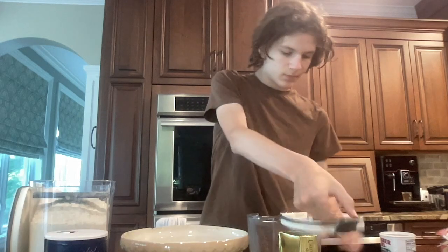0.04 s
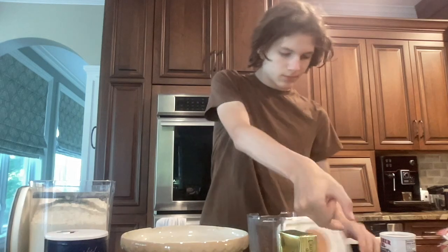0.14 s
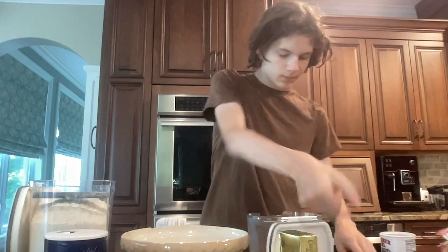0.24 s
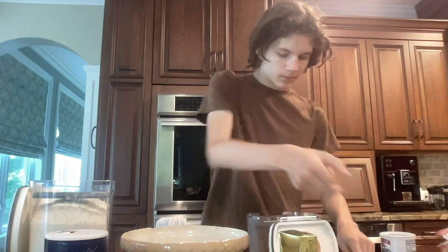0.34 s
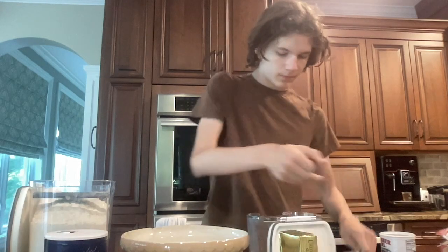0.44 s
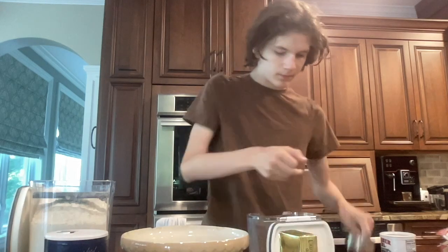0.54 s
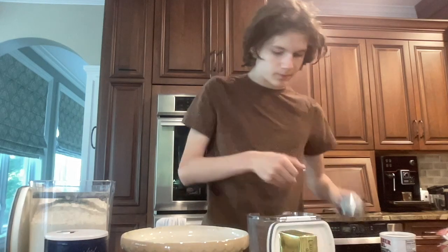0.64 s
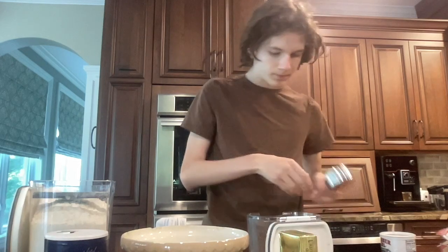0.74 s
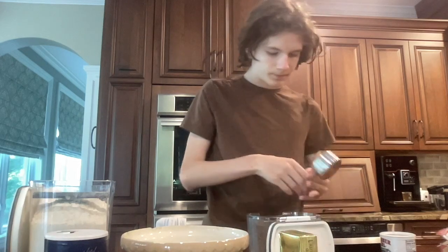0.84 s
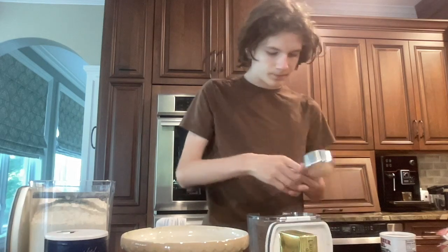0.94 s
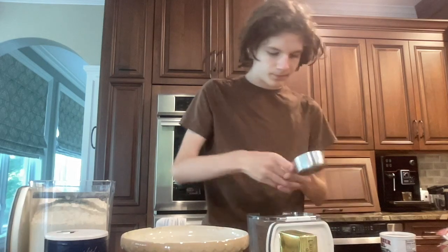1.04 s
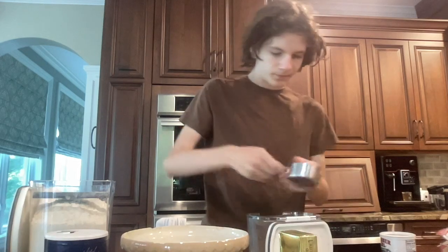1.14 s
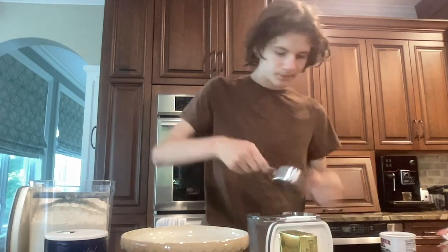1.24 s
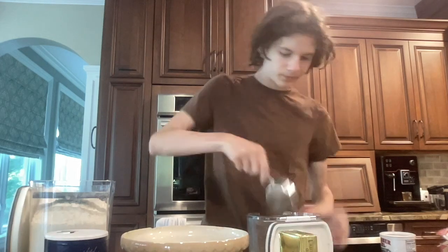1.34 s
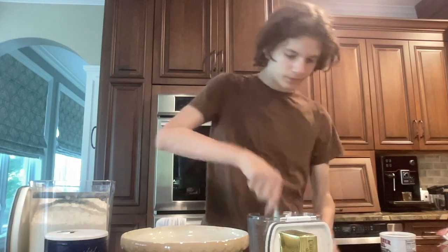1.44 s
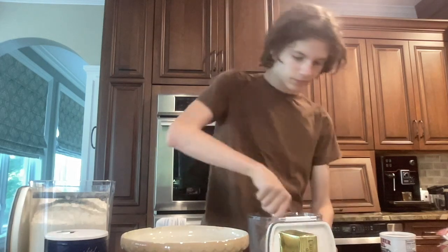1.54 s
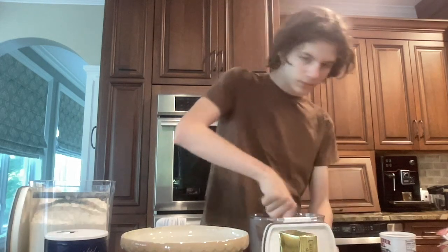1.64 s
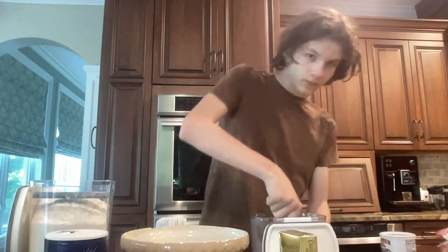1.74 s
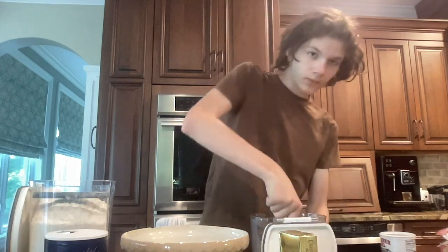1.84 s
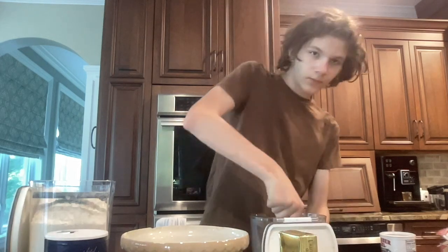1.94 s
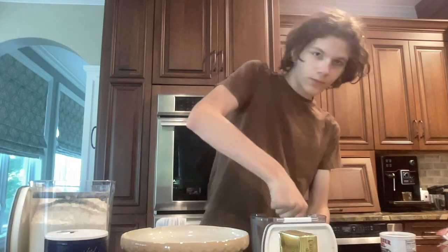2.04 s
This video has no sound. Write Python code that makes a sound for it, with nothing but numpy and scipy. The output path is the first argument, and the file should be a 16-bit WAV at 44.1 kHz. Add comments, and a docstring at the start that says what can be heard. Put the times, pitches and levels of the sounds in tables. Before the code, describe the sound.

A container lands on a kitchen counter with loud, hollow, clattering knocks and a low cabinet boom, then a loose object ticks quietly until a metal cup hits the rim and scrapes into sugar; close microphone, hard room.

```python
"""A sugar container is set down on a kitchen counter, close to the microphone: faint touches, then heavy knocks and
bounces, made of damped modes and short noise bursts, with a boom from the cabinet below.
Something loose on the counter rocks on with ever quicker double ticks, until a second knock, when a steel measuring
cup strikes the rim; the loose object still ticks while the cup, ringing under friction, is pushed into the sugar.
The hard kitchen answers every blow with reflections and a tail of noise, over quiet room air."""
import sys
import numpy as np
from scipy import signal
from scipy.fft import rfft, irfft, next_fast_len
from scipy.io import wavfile

SR = 44100
rng = np.random.default_rng(int(sys.argv[2]) if len(sys.argv) > 2 else 0)


def wav_out(sig):
    """Save sig, one row per channel (or a flat mono array), as 16-bit PCM at SR to the path in sys.argv[1]."""
    wavfile.write(sys.argv[1], SR, np.round(np.clip(np.atleast_2d(sig).T, -1, 1) * 32767).astype(np.int16))


N = 92610  # 2.1 s
T = np.arange(SR) / SR  # one second, the length of every single sound

# Colour of the hard contact noise, columns: freq_hz [Hz], level_db [dB]
CLACK_COLOUR = [(100, -24), (400, -3.5), (800, -1.5), (1350, 1), (2200, -2.5), (3000, -9.5), (4500, -30.5),
                (16000, -49)]
# Colour of the loose object's click, columns: freq_hz [Hz], level_db [dB]
CLICK_COLOUR = [(150, -7), (600, 13.5), (850, -11.5), (1300, 0), (1950, 2.5), (2800, -11.5), (6200, -16),
                (8200, -18), (10000, -33)]
# The counter's give under a weight, columns: freq_hz [Hz], level_db [dB], t60_s [s]
WOOD_MODES = [(140.34, -10.5, 0.18), (203.1, -3, 0.0547)]
# Decay of the noise that starts each burst, before burst() reshapes it
CLACK_T60_S, CLICK_T60_S = 0.0174, 0.0533
CONTACT_RISE_S, BOOM_RISE_S = 0.00054, 0.013
# How strongly each sound feeds the diffuse tail of the room
THUNK_WET_DB, CLACK_WET_DB = -1.5, -4.5


def amp(db):
    """Decibels to gain."""
    return 10 ** (np.asarray(db) / 20)


def unit(x):
    """Scale to rms 1."""
    return x / np.sqrt(np.mean(x ** 2) + 1e-20)


def along(points, hz):
    """Read (Hz, value) points at any frequency, on a log axis."""
    f, v = np.transpose(points)
    return np.interp(np.log(hz + 1), np.log(f + 1), v)


def filtered(x, gain):
    """x times a gain that depends on frequency."""
    m = next_fast_len(len(x) + SR // 2)
    hz = np.fft.rfftfreq(m, 1 / SR)
    return irfft(rfft(x, m) * gain(hz), m)[:len(x)]


def noise(colour):
    """Steady coloured noise of rms 1."""
    white = rng.standard_normal(N)
    return unit(filtered(white, lambda hz: amp(along(colour, hz))))


def add(track, s, sound):
    """Mix a sound in at time s."""
    part = track[max(0, round(s * SR)):][:len(sound)]
    part += sound[:len(part)]


def causal(colour):
    """The minimum-phase response that has this colour."""
    gain = amp(along(colour, np.fft.rfftfreq(SR, 1 / SR)))
    cepstrum = irfft(np.log(gain), SR)
    cepstrum[1:SR // 2] *= 2
    cepstrum[SR // 2 + 1:] = 0
    return np.exp(rfft(cepstrum))


def burst(colour, t60):
    """Many dense, quickly damped modes of uneven strength, then coloured; the energy depends only on t60."""
    fade = amp(-60 * T / t60)
    spectrum = rfft(rng.standard_normal(SR) * fade)
    evened = spectrum / np.abs(spectrum) ** .4  # strong and weak modes drawn closer
    x = irfft(evened, SR) * np.sqrt(np.sqrt(fade))
    coloured = irfft(rfft(x) * causal(colour), SR)
    return unit(coloured) * np.sqrt(np.mean(fade ** 2))


def ring(modes, rise_s, scatter=0, pitch=1):
    """Damped modes, in step or with scattered phases (scatter in turns)."""
    turns = scatter * rng.random(len(modes))
    tones = np.zeros(SR)
    for (hz, db, t60), turn in zip(modes, turns):
        tones += amp(db - 60 * T / t60) * np.sin(2 * np.pi * (pitch * hz * T + turn))
    return tones * (1 - np.exp(-T / rise_s))


def kitchen(sound, wet_db=0):
    """A sound with its near reflection, clumpy scatter from the cupboards and a diffuse tail."""
    # Decay of the tail, columns: freq_hz [Hz], t60_s [s]
    tail_t60 = [(100, 1.33), (500, 0.5236), (2000, 0.6884), (5000, 0.673), (9000, 0.38), (15000, 0.16)]
    # Level of the tail, columns: freq_hz [Hz], level_db [dB]
    tail_level = [(60, -3), (250, -1), (520, -13), (800, -7.5), (3000, -12), (8000, -4.5), (15000, -5.5)]
    early_db, early_t60_s, rise_s = -9, 0.24, 0.0033
    clump_db, clumps_per_s = 3, 240  # spread and rate of the uneven clumps
    wall_s, wall_db = 0.0093, -17  # the nearest reflection

    # Noise that dies away at its own rate in each band
    hz, t, z = signal.stft(rng.standard_normal(SR), SR, nperseg=256)
    t60 = along(tail_t60, hz)[:, None]
    decay = amp(along(tail_level, hz)[:, None] - 60 * t / t60)
    even_energy = np.sqrt(2 * np.log(1000) / (t60 * SR))
    tail = signal.istft(z * decay * even_energy, SR, nperseg=256)[1][:SR]

    rise = 1 - np.exp(-(T / rise_s) ** 2)
    wander = np.interp(T * clumps_per_s, np.arange(SR), rng.standard_normal(SR))
    clumps = unit(amp(clump_db * wander))
    scatter = rng.standard_normal(SR) * clumps * rise * amp(-60 * T / early_t60_s)
    early = unit(scatter) / np.sqrt(SR)  # total energy 1

    answer = amp(wet_db) * tail * rise + amp(early_db) * early
    answer[0] = 1  # the direct sound
    answer[round(wall_s * SR)] += amp(wall_db)
    return signal.fftconvolve(sound, answer)[:N]


def air():
    """The quiet air of the room: steady noise, mostly low."""
    # Colour of the air, columns: freq_hz [Hz], level_db [dB]
    air_colour = [(25, -8), (60, 0.5), (130, 8.5), (250, -2.5), (550, -2.5), (1000, -23.5), (5000, -27.5),
                  (10000, -43)]
    return amp(-68) * noise(air_colour)


def boom():
    """The cabinet below swells, shudders and hums on: low modes and unpitched rumble."""
    # The cabinet's hum, columns: freq_hz [Hz], level_db [dB], t60_s [s]
    cabinet_modes = [(47.5, -15.5, 0.31), (59.5, -3, 0.37), (89.56, -10, 0.44), (123.39, -2, 0.47),
                     (143.88, -4, 0.44)]
    # The cabinet's unpitched rumble, columns: freq_hz [Hz], level_db [dB]
    shudder_colour = [(35, -34.5), (65, 0), (150, -0.5), (600, -33.5)]
    shudder = burst(shudder_colour, 0.38) * (1 - np.exp(-T / BOOM_RISE_S))
    return ring(cabinet_modes, BOOM_RISE_S) / 2 + amp(-11.5) * shudder


def thunk(pitch=1):
    """The hollow note that a contact draws from the counter; its pitch depends on where the blow falls."""
    # The counter's hollow note at pitch 1, columns: freq_hz [Hz], level_db [dB], t60_s [s]
    thunk_modes = [(226.18, -26.5, 0.019), (352.6, -15.5, 0.075), (530.13, -8, 0.067), (567.14, -1, 0.031),
                   (646, -13, 0.041), (775.2, -6.5, 0.016), (1136.4, -8, 0.012)]
    low_edge = signal.butter(2, 240.6, "highpass", fs=SR, output="sos")
    return signal.sosfilt(low_edge, ring(thunk_modes, CONTACT_RISE_S, pitch=pitch))


def grip():
    """Fingers shift on the cup with a long, faint squeak: a narrow band of noise that swells and fades."""
    # The squeak, columns: centre_s [s], half_length_s [s], squeak_hz [Hz], squeak_db [dB]
    squeak_setting = (0.7, 0.26, 3798, -73.5)
    s, half, hz, squeak_db = squeak_setting
    width_hz = 44  # from the centre to 1/e of the gain
    white = rng.standard_normal(N)
    squeak = unit(filtered(white, lambda f: np.exp(-((f - hz) / width_hz) ** 2)))
    return amp(squeak_db) * squeak * np.exp(-((np.arange(N) / SR - s) / half) ** 2)


def cup():
    """The cup is handled, slides or digs: friction hisses and sets the steel ringing in narrow bands."""
    # Strokes of friction, columns: peak_s [s], rise_s [s], fall_s [s], level_db [dB]
    strokes = [(0.122, .012, 0.0303, -58), (0.475, .025, 0.01026, -50), (1.98, 0.0984, 0.071, -60),
               (2.07, 0.0327, 0.0195, -51.5)]
    # The cup's ring when rubbed, columns: freq_hz [Hz], level_db [dB]
    cup_modes = [(1120, -3.5), (1976, 5.5), (2180, -1.5), (3768, -1), (7171, -0.5), (8850, -2),
                 (12096, -6.5)]
    # Colour of the friction hiss, columns: freq_hz [Hz], level_db [dB]
    sugar_colour = [(150, -23), (500, 0), (900, -10), (2000, -9), (2800, -17.5), (8000, -28.5),
                    (15000, -36.5)]
    width_hz = 22  # full width of each resonance at half gain

    t = np.arange(N) / SR
    stroke = np.zeros(N)
    for s, rise, fall, db in strokes:
        stroke += amp(db) * np.exp(-((t - s) / np.where(t < s, rise, fall)) ** 2)

    def resonance(f):
        """The cup's modes as gain peaks."""
        return sum(amp(db) / (1 + (2 * (f - hz) / width_hz) ** 2) for hz, db in cup_modes)

    steel = unit(filtered(rng.standard_normal(N), resonance))
    return kitchen(stroke * (noise(sugar_colour) + amp(-6) * steel))


def thud():
    """The loose object falls back: the thunk, the give of the counter and a click."""
    body = thunk() + amp(-1.5) * ring(WOOD_MODES, CONTACT_RISE_S)
    return kitchen(body + amp(-2) * burst(CLICK_COLOUR, CLICK_T60_S), wet_db=-4.5)


def rocking():
    """Each swing of the loose object: a light touch, a ringing click, then a dull thud as it falls back."""
    # Swings, columns: start_s [s], click_db [dB], ring_db [dB], fall_delay_s [s], thud_db [dB]
    swings = [(0.7799, -38, -42, 0.03493, -38), (0.9892, -42, -39.5, 0.03215, -38),
              (1.177, -46, -43.5, 0.0364, -42.5), (1.3440, -47, -45, .039, -46),
              (1.4881, -52.5, -55.5, 0.03, -64), (1.6476, -39, -27, 0.0607, -39),
              (1.9315, -34.5, -34, 0.03655, -42)]
    # The loose object's ring, columns: freq_hz [Hz], level_db [dB], t60_s [s]
    loose_modes = [(1853.8, -8.5, 0.038), (2312.4, -11, 0.025), (4877.7, -10, 0.0427),
                   (5096, -9.5, 0.01336), (8097, -8, 0.011), (8638, -8, 0.0064)]
    lead_s, lead_db = 0.0092, -10.5  # the light touch before each click
    click_thunk_db, fall_boom_db = -1.5, -13.5
    track = np.zeros(N)
    for s, click_db, ring_db, delay, thud_db in swings:
        click = amp(click_db) * (burst(CLICK_COLOUR, CLICK_T60_S) + amp(click_thunk_db) * thunk())
        touch = burst(CLACK_COLOUR, CLACK_T60_S)
        add(track, s - lead_s, amp(click_db + lead_db) * touch)
        ringing = amp(ring_db) * ring(loose_modes, CONTACT_RISE_S, scatter=0.946)
        add(track, s, kitchen(click + ringing, wet_db=-3.5))
        add(track, s + delay, amp(thud_db) * thud())
        add(track, s + delay, amp(thud_db + fall_boom_db) * boom())
    return track


def rim_strike():
    """The cup strikes the container's rim, which rings in two short modes."""
    # The strike, columns: start_s [s], level_db [dB]
    strike = (1.5077, -17)
    # The rim's ring, columns: freq_hz [Hz], level_db [dB], t60_s [s]
    rim_modes = [(1098.5, -1, 0.0167), (2851.3, 4.5, 0.0138)]
    track = np.zeros(N)
    s, db = strike
    add(track, s, amp(db) * kitchen(ring(rim_modes, CONTACT_RISE_S, scatter=0.943), CLACK_WET_DB))
    return track


def landing():
    """The container settles on its soft, broad base: a muffled thunk, a little lower, with no click."""
    muffle = signal.butter(2, 703, fs=SR, output="sos")  # low-pass, Hz
    return signal.sosfilt(muffle, thunk(pitch=0.94))


def landings():
    """Dull landings of the container: a muffled thud, the counter's woody give and the cabinet's boom."""
    # Landings, columns: start_s [s], thud_db [dB], wood_db [dB], boom_db [dB]
    settles = [(0.2780, -6, -18, -17), (0.3170, -30.5, -18.5, -21), (0.34, -15, -25.5, -25),
               (0.5691, -23.5, -28, -47), (1.5310, -21.5, -31.5, -38.5), (1.5590, -23.5, -36.5, -39)]
    track = np.zeros(N)
    for s, thud_db, wood_db, boom_db in settles:
        add(track, s, amp(thud_db) * kitchen(landing(), THUNK_WET_DB))
        add(track, s, amp(wood_db) * kitchen(ring(WOOD_MODES, CONTACT_RISE_S), wet_db=-9.5))
        add(track, s, amp(boom_db) * boom())
    return track


def knocks():
    """Each blow gives a hollow thunk, a clack, a short ring and a bright crack, and shakes the cabinet."""
    # Blows, columns: start_s [s], thunk_db [dB], thunk_pitch [ratio], clack_db [dB],
    # wall_ring_db [dB], crack_db [dB]
    blows = [(0.1150, -34, .9, -52.5, -61.5, -54), (0.1407, -34.5, 1.157, -56.5, -62.5, -56.5),
             (0.1680, -47.5, 0.67, -49, -72.5, -67), (0.2232, -7.5, 0.961, -9, -27, -16),
             (0.2354, -8, 0.893, -7.5, -18.5, -5), (0.2645, -12, 1.06, -24, -35, -43),
             (0.3150, -18.5, 1.087, -17.5, -12.5, -21), (0.5549, -37.5, 0.918, -40.5, -52.5, -53),
             (0.5661, -25.5, 0.9167, -22, -23.5, -28.5), (1.5077, -8, 1, -13, -39, -20),
             (1.6478, -41, 1.087, -54, -42.5, -36.5)]
    # The container's wall, columns: freq_hz [Hz], level_db [dB], t60_s [s]
    wall_modes = [(1373.8, 2, 0.017), (1517, -7, 0.014), (2301, -4, 0.023)]
    # Colour of the bright crack, columns: freq_hz [Hz], level_db [dB]
    crack_colour = [(500, -24.5), (2400, -13.5), (3500, 7.5), (4800, 2), (6500, -2.5), (8000, 1.5),
                    (9200, -7), (14000, -10), (16000, -24)]
    knock_boom_db = -22  # cabinet boom under each thunk
    track = np.zeros(N)
    for s, thunk_db, pitch, clack_db, ring_db, crack_db in blows:
        clack = amp(clack_db) * burst(CLACK_COLOUR, CLACK_T60_S)
        wall = amp(ring_db) * ring(wall_modes, CONTACT_RISE_S, scatter=1)
        crack = amp(crack_db) * burst(crack_colour, 0.01381)
        add(track, s, kitchen(clack + wall + crack, CLACK_WET_DB))
        add(track, s, amp(thunk_db) * kitchen(thunk(pitch), THUNK_WET_DB))
        add(track, s, amp(thunk_db + knock_boom_db) * boom())
    return track


def scene():
    """Everything on the counter, over the quiet air of the room."""
    container = knocks() + landings() + rim_strike()
    loose_object = rocking()
    handling = cup() + grip()
    return (container + loose_object + handling + air())[None]


def record(dry):
    """The small microphone loses the deepest bass and rounds off high peaks; a steep low-pass ends the band."""
    low_cut_hz, top_hz, full_scale = 30, 16000, 0.81
    thin = signal.sosfilt(signal.butter(4, low_cut_hz, "highpass", fs=SR, output="sos"), dry)
    held = thin / (1 + (thin / full_scale) ** 4) ** .25  # soft overload
    return signal.sosfilt(signal.ellip(10, .1, 90, top_hz, fs=SR, output="sos"), held)


dry = scene()
out = record(dry)
wav_out(out)
```